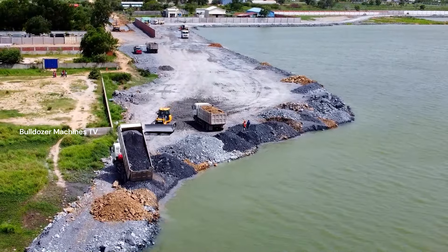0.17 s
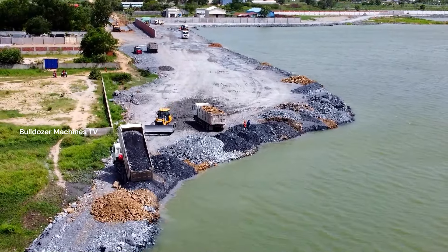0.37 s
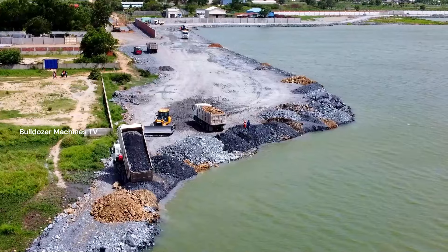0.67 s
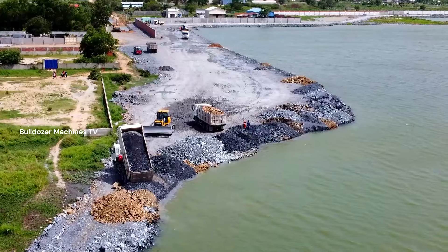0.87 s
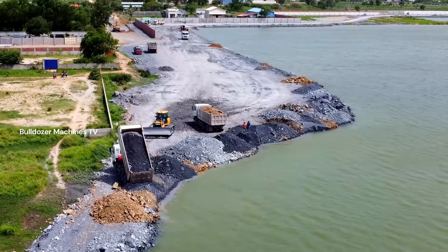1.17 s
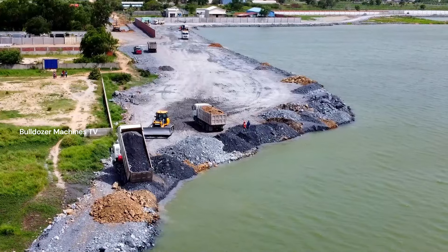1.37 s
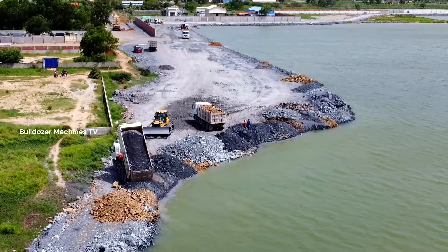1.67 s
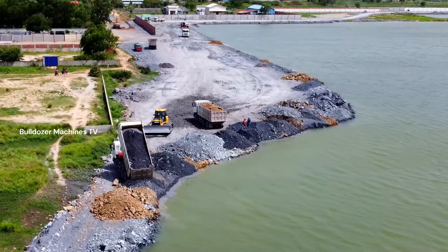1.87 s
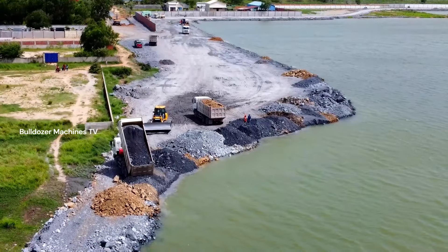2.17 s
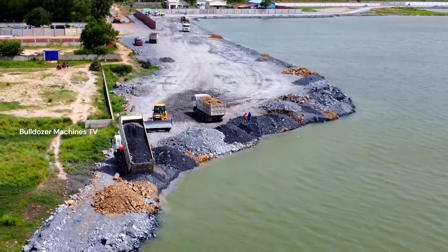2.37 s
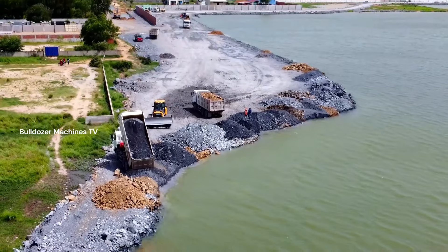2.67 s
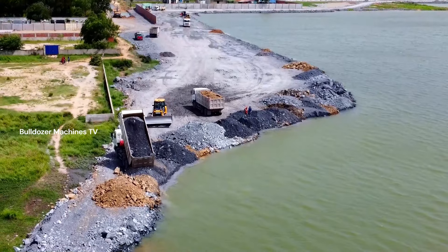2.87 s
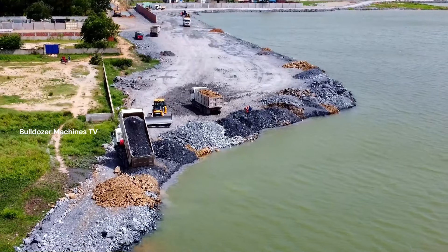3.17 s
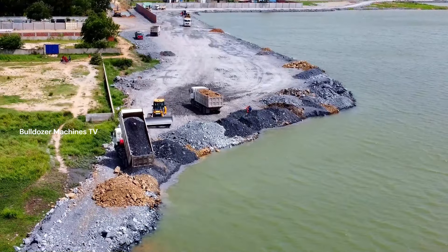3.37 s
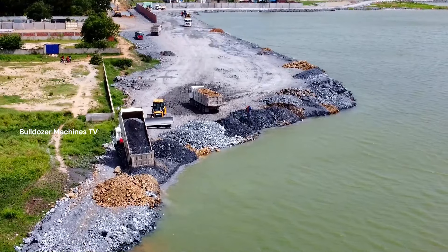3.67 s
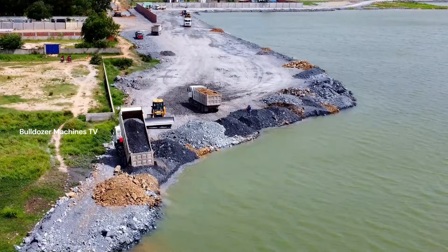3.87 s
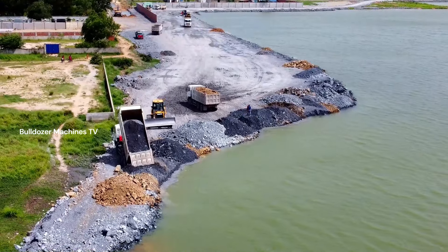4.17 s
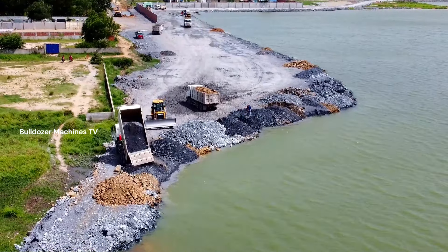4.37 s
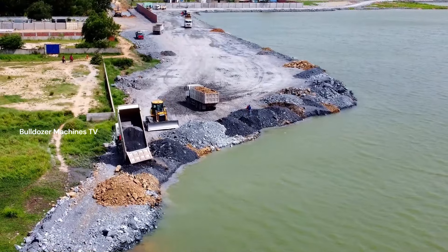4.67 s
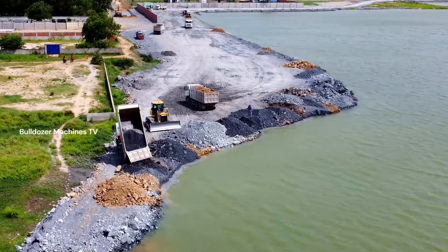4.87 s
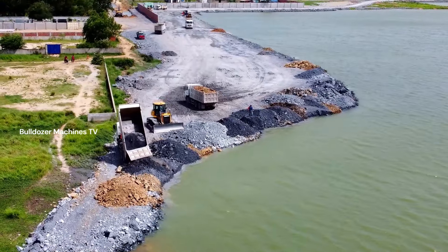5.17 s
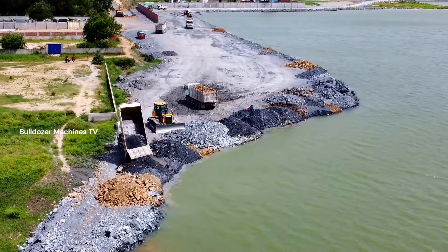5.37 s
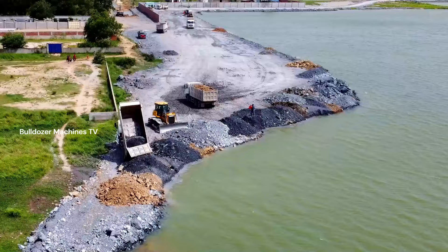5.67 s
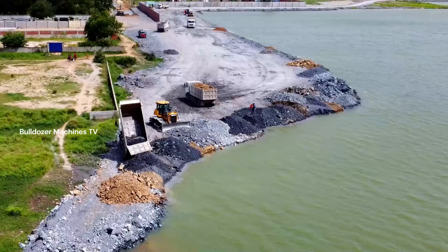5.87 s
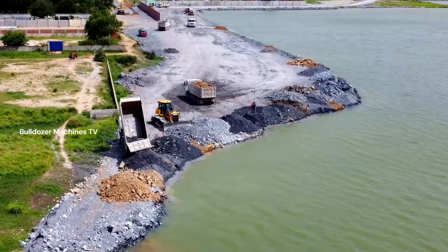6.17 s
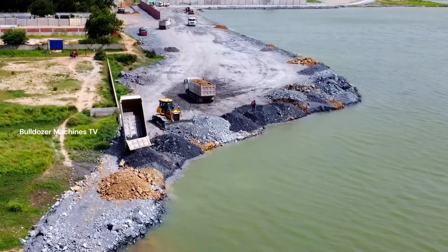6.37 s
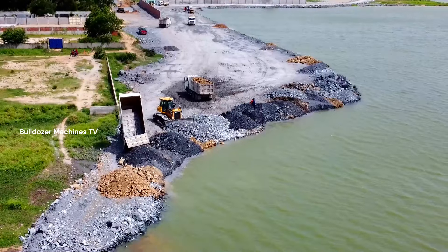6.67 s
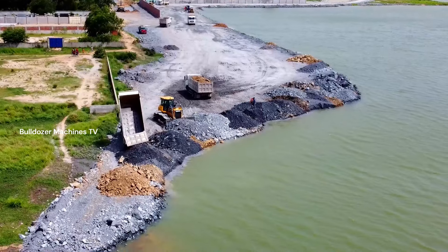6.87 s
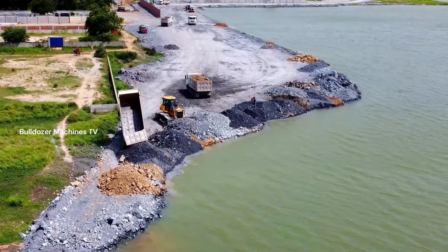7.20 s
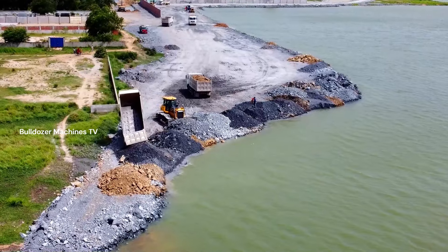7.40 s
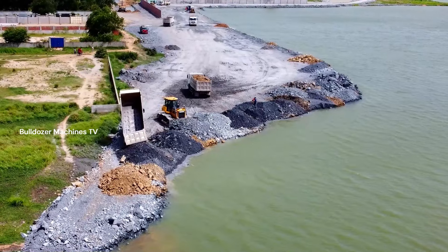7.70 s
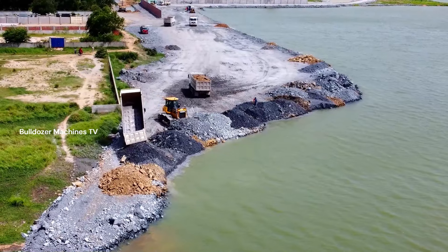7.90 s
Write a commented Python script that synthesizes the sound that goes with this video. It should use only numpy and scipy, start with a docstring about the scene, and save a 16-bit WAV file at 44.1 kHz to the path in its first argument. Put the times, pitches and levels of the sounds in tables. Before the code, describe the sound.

A dump truck unloads rock outdoors: dull thuds, sharp knocks, sliding gravel rushes, a straining engine, then hollow metal bangs and gusts on the microphones.

```python
"""Big stones thud and crack over a hiss of sliding gravel as a dump truck tips its load outdoors. The load is
showers of tiny filtered knocks and noise, under single blows placed in time; the diesel, a few sine overtones,
sags and picks up. Stone scrapes and bangs on the steel bed, which booms as a gliding sine, and near the end the
loose tailgate slams twice; the blows are noise and modes. A squeal, ground rumble, distant machines and gusts
of wind at the microphones lie around it."""
import sys
import numpy as np
from scipy import signal
from scipy.fft import rfft, irfft, next_fast_len
from scipy.io import wavfile
from scipy.ndimage import uniform_filter1d, map_coordinates

SR = 44100
rng = np.random.default_rng(int(sys.argv[2]) if len(sys.argv) > 2 else 0)


def master(y):
    """Save y as 16-bit WAV."""
    cut = np.clip(np.atleast_2d(y).T, -1, 1)
    pcm = np.round(cut * 32767)  # scale
    wavfile.write(sys.argv[1], SR, pcm.astype(np.int16))


N = 354475  # length in samples

# The flow of the load, before surges and slumps.
# Each row: time in seconds, then tumbling stones, sliding gravel and fine grit, each a level in dB.
LOAD_FLOW = [(0, -26.5, -32.5, -38.5), (.45, -27, -32.5, -37.5), (.72, -21.5, -30, -35.5),
             (1, -20.5, -30, -39), (1.5, -30.5, -35.5, -34.5), (1.85, -28, -33, -34), (2.2, -36, -36, -38),
             (2.85, -28, -34.5, -40.5), (3.25, -32, -34, -37), (3.5, -24.5, -28.5, -35.5),
             (3.82, -26.5, -31, -38.5), (5, -26, -28, -38.5), (5.24, -23, -26.5, -31),
             (5.345, -26, -27.5, -31), (5.42, -19.5, -26.5, -35), (5.54, -26.5, -29, -36.5),
             (5.88, -26.5, -28.5, -38.5), (6.12, -27, -32.5, -40.5), (6.3, -45, -36, -39.5),
             (6.62, -41, -40, -49.5), (6.78, -48, -42.5, -51), (7.1, -30, -43.5, -55),
             (7.55, -47.5, -38.5, -50), (8.04, -38, -45, -49.5)]
# The load slumps, gathering speed until it stops short.
# Each row: start in seconds, length in seconds, lift of the gravel in dB.
LOAD_SLUMPS = [(3.362, 0.27, 8), (3.87, 0.29, 5.5)]
SLUMP_STOP_S = 0.12
CRUNCH_DB = -6  # against the gravel flow
# Loose stones stop rolling off the top.
ROLLING_END_S, ROLLING_FADE_S = 1.46, 0.45

# Dull, heavy blows of stone and bed.
# Each row: start in seconds, level in dB, pitch in Hz, 60 dB decay in seconds, shaken rubble in dB.
HEAVY_THUDS = [(0.079, -14.5, 272, 0.065, -19), (0.23, -11.5, 231, 0.17, -13),
               (0.273, -5.5, 327, 0.043, -14.0), (0.511, -11, 257, 0.017, -29),
               (0.671, -13.5, 263, 0.075, -18.5), (0.687, -8.5, 246, 0.03, -20.5),
               (0.807, -8.5, 618, 0.084, -13.0), (0.891, -8.5, 192.0, 0.1, -18.5),
               (0.906, -13, 192.0, 0.13, -32), (0.966, -18, 275.0, 0.09, -16.5),
               (0.997, -10, 219, 0.05, -27.0), (1.057, -13, 246, 0.026, -30),
               (1.099, -7.5, 240, 0.033, -27), (1.123, -11.5, 447, 0.11, -21),
               (1.151, -14, 237.0, 0.02, -20), (1.242, -15, 260, 0.056, -27),
               (1.298, -11, 433.0, 0.084, -23), (1.37, -8, 252.0, 0.028, -21),
               (1.717, -8.5, 434, 0.13, -12), (1.895, -11.0, 428, 0.077, -19.5),
               (2.277, -16, 309, 0.12, -27), (2.367, -9.5, 441, 0.025, -29), (2.41, -8, 244.0, 0.033, -33),
               (2.43, -20, 237.0, 0.035, -30.0), (2.458, -17.0, 301.0, 0.1, -25),
               (2.558, -7.5, 232, 0.032, -18), (2.618, -14, 450, 0.028, -25),
               (2.804, -18, 320.0, 0.057, -25.0), (2.882, -12.5, 301.0, 0.015, -28.0),
               (2.936, -12, 235, 0.036, -20), (2.939, -14, 105, 0.12, -38),
               (3.014, -12.5, 320.0, 0.016, -37.0), (3.053, -17.0, 332, 0.1, -19.5),
               (3.408, -14, 365, 0.042, -18.5), (3.48, -13, 416, 0.072, -25),
               (3.507, -19, 237.0, 0.062, -21), (3.633, -15, 505, 0.09, -20), (3.659, -10, 192, 0.05, -15),
               (3.671, -7.5, 444, 0.02, -20), (4.165, -5, 210.0, 0.033, -14), (4.221, -15, 100, 0.12, -28),
               (4.235, -12.0, 186.0, 0.09, -18), (5.189, -16, 364, 0.09, -24),
               (5.245, -14, 267.0, 0.079, -17), (5.256, -14, 267.0, 0.06, -17),
               (5.385, -15, 423, 0.1, -18.5), (5.432, -16.5, 437, 0.15, -22),
               (5.603, -9.5, 435, 0.049, -19), (6.994, -13.5, 407.0, 0.074, -12.5),
               (7.026, -14, 388, 0.078, -22), (7.269, -12.5, 196, 0.065, -18.0)]
RUBBLE_T60_S = 0.15
# Stone grinding on stone or under the tailgate.
# Each row: start in seconds, level in dB, pitch in Hz, treble slope in dB per octave from 2.5 to 5 kHz.
GRINDING_CRACKS = [(0.032, -28, 2190, -17), (0.063, -19, 2490, -10), (0.229, -24, 1440, -19),
                   (0.269, -13, 1650, -12.5), (0.312, -23.5, 2550, 10), (.559, -21.5, 1660, -7),
                   (.599, -20.5, 1800, -19), (0.712, -21, 2610, -4), (.747, -23.5, 1610, -14),
                   (0.805, -13.5, 2500, -15), (.924, -22.5, 2500, 10), (0.971, -19, 1210, -12),
                   (0.995, -25.5, 2580, 6), (1.095, -16.5, 1790, -4), (1.119, -14.5, 1420, -2),
                   (1.298, -13.5, 1530, -16.5), (1.373, -36, 1440, -20), (1.715, -20.5, 2560, -3),
                   (1.974, -16, 1560, -7.5), (2.235, -24, 2060, -2), (2.275, -24, 1500, -7),
                   (2.365, -28, 2300, -14), (2.438, -34, 2700, -6), (2.474, -27, 3000, 0),
                   (2.611, -27.5, 2400, -12), (2.733, -28, 1690, -7.5), (2.816, -24.5, 1360, -16),
                   (3.238, -27.5, 2740, -11), (3.316, -23, 1470, -13), (3.398, -17, 3580, -5.5),
                   (3.579, -18.5, 1620, 4), (3.632, -15, 1150, -7), (3.655, -13.5, 1130, -7),
                   (3.701, -18.5, 2230, -3), (3.729, -19.5, 3730, -5), (4.16, -10, 2500, -7),
                   (4.183, -15.5, 2470, -11), (4.223, -22, 2220, -5), (5.612, -17, 1680, -11),
                   (5.742, -34, 1600, -12), (5.763, -23, 1940, -18), (5.825, -19.5, 2370, -10),
                   (6.993, -18, 2920, -11.5), (7.03, -13, 1920, -19.5), (7.246, -23, 1600, -21),
                   (7.272, -19, 2500, -20), (7.322, -27, 2000, -16)]
CRACK_T60_S = 0.083
# Clean knocks of single stones.
# Each row: start in seconds, level in dB, nominal pitch in Hz, 60 dB decay in seconds.
STONE_KNOCKS = [(.064, -22.5, 1700, .025), (.228, -18, 700, .04), (.27, -18.5, 1396, 0.054),
                (.444, -14, 1480, .012), (.6, -14, 1254, 0.044), (.562, -24, 1500, .025),
                (.71, -17.5, 2300, .02), (.752, -20, 1600, .03), (.809, -7, 697, 0.077),
                (.811, -14, 1790, .04), (.972, -14, 1250, .04), (.996, -21, 2600, .025),
                (1.12, -17.5, 1510, .06), (1.298, -16, 1365, 0.045), (1.377, -23, 1440, .025),
                (1.508, -25, 1700, .018), (1.718, -10.5, 608, 0.063), (1.891, -13, 540, 0.088),
                (2.365, -6.5, 1260, 0.018), (2.367, -7, 652, 0.024), (2.439, -23, 2660, .016),
                (2.475, -13.5, 2500, 0.015), (2.506, -30, 1600, .014), (2.573, -23, 760, .025),
                (2.66, -6, 805, 0.021), (2.67, -24, 644, .025), (2.733, -28, 2300, .02),
                (2.815, -25, 1350, .022), (2.882, -22, 1500, .02), (2.968, -27, 1500, .03),
                (3.062, -26, 1400, .025), (3.239, -20, 3200, .014), (3.315, -22, 1450, .025),
                (3.402, -40, 1670, .01), (3.584, -15, 1630, 0.02), (3.657, -12, 1100, .035)]
# Splinters of stone. Each row: start in seconds, level in dB.
STONE_CHIPS = [(.272, -19), (0.711, -16.5), (0.861, -19), (1.065, -15), (1.589, -21.5), (1.717, -21),
               (2.299, -23), (3.005, -25.5), (3.398, -26.5), (3.659, -20)]
CHIP_T60_S = 0.013

# Blows on the steel bed and the tailgate. Each row: start in seconds, level in dB before tilt and lift,
# base decay in seconds, main pitch in Hz, treble tilt in dB per octave, lift at the main pitch in dB.
STEEL_BANGS = [(5.246, -22.5, 0.16, 515, 2.5, 13.5), (5.383, -27, 0.61, 520, 3, 14),
               (5.564, -22, 0.29, 646, 0, 5), (5.612, -26, 0.071, 544, -4.5, 15),
               (5.733, -24, 0.2, 1400, 0, 10), (5.757, -25.5, 0.17, 1010, 1.5, 15.5),
               (5.771, -29, 0.12, 1900, 0, 15), (5.832, -23.5, 0.23, 550, 2.5, 10.5),
               (5.888, -26, 0.071, 523, 1.5, 11.5), (6.785, -30.5, 0.98, 340, -5.5, -5),
               (6.977, -18, 0.19, 870, 0, 12), (6.991, -15.5, 0.16, 520, 1, -2),
               (7.022, -17.5, 0.073, 1500, -1.5, 8), (7.029, -17.5, 0.053, 2500, -2.5, 6),
               (7.058, -30.5, 0.25, 3000, -2, 13), (7.056, -28.5, 0.52, 925, -1.5, 9.5),
               (7.16, -29, 0.27, 700, -4, 3), (7.214, -23, 0.15, 945, -1, 12.5),
               (7.241, -20, 0.27, 770, -1, 8.5), (7.246, -27, .12, 2300, -1, 8),
               (7.267, -20, 0.24, 684, -2, 4), (7.288, -27, 0.11, 2400, -2.5, 9),
               (7.315, -24.5, 0.38, 443, -2.5, 8.5), (7.337, -30.5, 0.11, 800, 1, 9),
               (7.363, -32.5, 0.12, 3600, 2.5, 8), (7.372, -32.5, 0.12, 760, -2, 12.5)]
# What the steel rings with, before each blow detunes it.
# Each row: frequency in Hz, relative level in dB, 60 dB decay in seconds.
STEEL_MODES = [(187.5, 4, 0.4), (401.5, 3.5, 0.24), (585.6, -0.5, 0.17), (668, 0, 0.31), (818, -11.5, 0.33),
               (959, -2.5, 0.18), (1176, -3.5, 0.22), (1315, -12.5, 0.23), (1565, -8, 0.26),
               (1850, -6.5, 0.25), (2183, -15.5, 0.34), (2387, -7, 0.34), (2484, -15, 0.22),
               (2830, -9, 0.37), (3320, -18, 0.44)]
# Stone and tailgate drag over the steel.
# Each row: middle in seconds, length in seconds, level in dB, highest pitch of the hollow scrape in Hz.
BED_SCRAPES = [(3.652, 0.12, -26, 694), (3.944, 0.029, -26, 670), (4.114, 0.16, -31, 804),
               (5.196, 0.19, -22.5, 660), (5.693, 0.15, -28, 674), (5.775, 0.098, -26, 855),
               (6.01, .16, -32, 606), (6.197, 0.2, -38, 616), (6.852, 0.15, -33, 780),
               (6.965, .06, -30.5, 700)]
SCRAPE_WIDTH_HZ, SCRAPE_RASP_DB = 390, -10
SCRAPE_BEND = 0.08  # share of the pitch missing at the ends of the swell
# A stone edge makes the steel sing briefly.
# Each row: start in seconds, peak level in dB, pitch in Hz, 60 dB decay in seconds.
STEEL_PINGS = [(2.552, -38, 4800, 0.023), (3.695, -28.5, 5530, 0.18)]
# The emptying bed booms once and keeps droning while stones drag over it.
BOOM_START_S, BOOM_END_S = 5.56, 6.38
BOOM_HZ, BOOM_SAG_HZ_PER_S, BOOM_WAVER_HZ = 110.6, 5.6, 3.03
BOOM_DB, BOOM_RISE_S, BOOM_T60_S = -23.5, 0.07, 0.7
DRONE_DB, DRONE_RELEASE_S = -30, 0.056

# The diesel lugs down under the hoist and recovers.
# Each row: time in seconds, mean firing rate in Hz, mean level in dB.
ENGINE_LUGGING = [(0, 70.7, -26.5), (.2, 68.5, -23), (.47, 71, -24), (.85, 64.4, -34.5), (1.6, 53, -32.5),
                  (2.15, 42.7, -29), (2.42, 37.94, -42), (2.7, 35.56, -35), (3.03, 36.5, -32),
                  (3.27, 42.35, -20), (3.45, 39.5, -21.5), (3.6, 36, -27), (3.73, 38.85, -31),
                  (3.94, 50.9, -18.5), (4.55, 69.7, -35), (5.8, 67, -40), (6.1, 69.44, -24),
                  (6.45, 67.4, -37), (6.9, 66.86, -28), (7.2, 65, -37), (7.6, 62, -45), (7.92, 76, -21.5),
                  (8.04, 75.4, -32)]
# Exhaust overtones. Each row: multiple of the firing rate, relative level in dB.
EXHAUST_OVERTONES = [(1, -5), (2, -19.5), (3, -22.5)]
# The exhaust pipe lifts any overtone above the first that falls near its own note.
PIPE_HZ, PIPE_OCTAVES, PIPE_DB = 76, 0.2, 10.5
# A faint squeal of the truck. Each row: time in seconds, level in dB, pitch in Hz.
TRUCK_SQUEAL = [(7.75, -73, 4444), (7.85, -58, 4500), (7.99, -46, 4675), (8.04, -51, 4700)]

# The ground rumbles all the time, and harder under falling stones; the bare bed shudders too.
RUMBLE_DB, RUMBLE_UNDER_STONES_DB = -35, -8  # the second against the stone flow
RUMBLE_LUMPS_DB, RUMBLE_LUMPS_PER_S = 3, 16
BARE_BED_DB, SHUDDER_FADE_DB_PER_S = -29, 0.5
GROUND_SHAKE_DB, GROUND_SHAKE_T60_S = -19, 0.12  # level against the thud
SITE_DB = -40.5
# Wind at the microphones, before eddies. Each row: time in seconds, level in dB.
WIND_GUSTS = [(5.3, -61), (5.56, -30), (5.85, -48), (6.22, -46), (6.27, -24), (6.42, -31), (6.49, -39),
              (6.6, -31), (6.73, -25), (6.98, -23.5), (7.12, -36), (7.42, -39), (7.52, -22.5), (7.63, -38),
              (8.04, -35)]
EDDY_DB, EDDIES_PER_S = 4, 42

# Relative spectra of the sources. Each row: frequency in Hz, density in dB per Hz.
STONES_SPECTRUM = [(90, -13), (150, -2), (215, 2), (320, 1), (480, 1), (620, -3), (780, -7.5), (1100, -52),
                   (2500, -65)]
GRAVEL_SPECTRUM = [(400, 5.5), (850, 0.5), (1400, 1), (2000, -3), (2550, 1), (3200, -7), (4200, -6),
                   (6000, -10.5), (10000, -16), (13000, -53)]
GRIT_SPECTRUM = [(1800, -8), (3800, -4.5), (5500, -2.5), (7000, -1), (8500, -0.5), (10200, 6),
                 (11500, -7.5), (13000, -20), (15000, -38)]
CRACK_SPECTRUM = [(400, 7), (900, 3.5), (2600, 0.5), (4000, 3.5), (7000, -1), (10200, 2.5), (11500, -12),
                  (13000, -32), (15000, -47)]
CHIP_SPECTRUM = [(2000, -10), (4500, -4), (7000, 3), (11500, 2.5), (13000, -29), (15000, -25)]
CRASH_SPECTRUM = [(60, -28), (110, -6), (180, 5), (430, -3.5), (620, -2.5), (950, -1), (1250, -9.5),
                  (1800, -10), (2700, -12), (3700, -14), (7000, -24), (10000, -36), (13000, -56)]
GROUND_SPECTRUM = [(18, -33), (35, -26), (55, 1), (100, 2), (160, -5.5), (260, -17.5), (500, -39),
                   (1000, -85)]
SITE_SPECTRUM = [(60, -6), (280, 0.5), (480, -13), (800, -16), (1300, -14), (2000, -19.5), (2500, -17.5),
                 (3200, -22.5), (5000, -28.5), (9000, -43), (13000, -60)]
WIND_SPECTRUM = [(20, -14), (65, 0), (110, -3), (200, -5.5), (400, -9.5), (620, -11.5), (1000, -16.5),
                 (1500, -49), (3000, -65)]

# Likeness of the two microphones. Each row: frequency in Hz, likeness (held within 0 to 1 in use).
ROCK_LIKENESS = [(750, 2), (950, 0.43), (1200, 0.5), (2600, 0), (4800, 0.54), (6000, 0.97), (9000, 0.78),
                 (11200, 1.42)]
STEEL_LIKENESS = [(250, 0.88), (550, 0.68), (950, .3), (1500, 0.89), (3000, 0.63), (8000, 0.31)]
# Phase between the microphones. Each row: frequency in Hz, lead of the left in radians.
ROCK_LEAD = [(220, 0), (340, .35), (600, 1.45), (950, 2.9), (1500, 5.9), (1900, 6.3), (2500, 8.1),
             (3300, 6.8), (5500, 12.2), (6600, 13.2), (7700, 14.9), (9900, 15.7), (11000, 17.3),
             (11600, 18.85)]
STEEL_LEAD = [(150, -.1), (380, -.45), (580, -1.14), (950, 0.55), (1600, 0.25), (2600, -0.2), (5000, 0)]
# Balance of the microphones. Each row: frequency in Hz, left minus right in dB.
ROCK_SLANT = [(150, -0.5), (260, -2), (420, -3.5), (800, 1), (1300, -0.5), (1900, 1), (2350, -5.5),
              (3400, 1), (7000, -1), (11000, 0)]
STEEL_SLANT = [(150, -2), (350, -1.5), (600, -13), (950, -7), (1500, -1), (2500, -2.5), (8000, -1)]
EDGE_HZ = 15300  # top of the finished band


def gain_of(db):
    """Decibels to gain."""
    return 10 ** (np.asarray(db) / 20)


def evened(x):
    """Scales to an rms of 1."""
    return x / np.sqrt(np.mean(x ** 2) + 1e-20)


def read(points, hz):
    """Reads a frequency table on a log-frequency axis."""
    f, value = np.transpose(points)
    return np.interp(np.log(hz + 1), np.log(f + 1), value)


def curves(rows):
    """Each column of a control table, sample by sample."""
    s, *columns = np.transpose(rows)
    return [np.interp(np.arange(N) / SR, s, c) for c in columns]


def add(mix, s, sound):
    """Mixes a sound in at time s."""
    part = mix[:, max(round(s * SR), 0):][:, :sound.shape[1]]
    part += sound[:, :part.shape[1]]


def noise(length):
    """Stereo white noise, unrelated left and right."""
    return rng.standard_normal((2, length))


def shaped(x, db_at):
    """Filters by a function that gives dB for each frequency."""
    size = next_fast_len(x.shape[-1])
    gain = gain_of(db_at(np.fft.rfftfreq(size, 1 / SR)))
    return irfft(rfft(x, size) * gain, size)[..., :x.shape[-1]]


def coloured(x, spectrum):
    """Filters x by a spectrum table and scales to an rms of 1."""
    return evened(shaped(x, lambda f: read(spectrum, f)))


def bump(f, hz, octaves):
    """A bell of height 1 around hz on a log-frequency axis."""
    return np.exp(-(np.log2(f / hz) / octaves) ** 2)


def drift(per_s):
    """A random line through per_s knots a second, with an rms of 1."""
    knots = rng.standard_normal(int(N / SR * per_s) + 4)
    return evened(map_coordinates(knots, [np.arange(N) / SR * per_s], order=1))


def strike(t, rise, t60):
    """A blow's envelope: a soft rise, then a steady decay of at least 4 ms; its top is 1."""
    shape = (1 - np.exp(-(t / rise) ** 2)) * gain_of(-60 * t / max(t60, .004))
    return shape / shape.max()


def resonate(x, hz, width_hz):
    """A steep resonance that follows the curve hz: shift down to zero, low-pass, shift back; rms 1."""
    turn = np.exp(2j * np.pi * np.cumsum(hz) / SR)
    low_pass = signal.butter(2, width_hz / 2, fs=SR, output="sos")
    return evened((turn * signal.sosfilt(low_pass, x / turn)).real)


def patchy(x, patchy_db):
    """Lifts and dips random patches of time and frequency, so the colour wanders."""
    z = signal.stft(x, nperseg=512)[2]
    patches = uniform_filter1d(rng.standard_normal(z.shape[1:]), size=6, axis=0)
    patches = evened(uniform_filter1d(patches, size=22, axis=1))
    return evened(signal.istft(z * gain_of(patchy_db * patches), nperseg=512)[1][:, :N])


def grains(low_hz, high_hz, per_s, spread_db, t60, octaves, count=14):
    """A shower of small collisions; each size of stone has its own pitch, and the force is random."""
    t, out = np.arange(SR // 12) / SR, np.zeros((2, N))
    for hz in np.geomspace(low_hz, high_hz, count):
        knock = shaped(noise(len(t)), lambda f: -3 * (np.log2((f + 1) / hz) / octaves) ** 2)
        knock = evened(knock * strike(t, t60 / 20, t60)) * np.sqrt(hz)
        hit = rng.random(N) < per_s / count / SR
        force = gain_of(spread_db * np.minimum(rng.exponential(1, N)[hit], 4))
        clicks = np.zeros(N)
        clicks[hit] = force * (-1) ** np.arange(len(force))  # alternating signs
        out += signal.oaconvolve(clicks[None], knock, axes=1)[:, :N]
    return evened(out)


def load():
    """Stones tumble, gravel scrapes and grit hisses, all in the same small surges."""
    stones_db, gravel_db, grit_db = flow()
    surge = drift(45)
    stones = grains(159, 805, per_s=800, spread_db=1.5, t60=0.034, octaves=0.62, count=8)
    stones = coloured(stones, STONES_SPECTRUM)
    gravel = grains(940, 8800, per_s=1000, spread_db=0.0, t60=0.022, octaves=0.47, count=9)
    gravel = coloured(patchy(gravel + 1.2 * noise(N), patchy_db=1.5), GRAVEL_SPECTRUM)
    # t60 sets the rise here; strike holds the decay at 4 ms
    grit = grains(4100, 19300, per_s=650, spread_db=3.0, t60=0.0031, octaves=0.24, count=8)
    grit = coloured(patchy(grit + 2.3 * noise(N), patchy_db=1.5), GRIT_SPECTRUM)
    return (stones * gain_of(stones_db + 0.11 * surge)
            + gravel * gain_of(gravel_db + 1.4 * surge)
            + grit * gain_of(grit_db + 1.16 * surge))


def slump(s, length):
    """Speed of one slump: a steady gain from 0 to 1, then a short stop."""
    return np.interp(np.arange(N) / SR, [s, s + length, s + length + SLUMP_STOP_S], [0, 1, 0])


def flow():
    """Levels in dB of stones, gravel and grit: the steady flow, lifted by each slump."""
    lift_db = sum(db * slump(s, length) for s, length, db in LOAD_SLUMPS)
    stones_db, gravel_db, grit_db = curves(LOAD_FLOW)
    return stones_db + 1.04 * lift_db, gravel_db + lift_db, grit_db + 0.68 * lift_db


def thuds():
    """A heavy blow gives a few dull cycles of a sine, with noise for the rubble it shakes."""
    t, out = np.arange(SR // 4) / SR, np.zeros((2, N))
    for s, db, hz, t60, rubble_db in HEAVY_THUDS:
        rubble = coloured(noise(len(t)), STONES_SPECTRUM) * strike(t, 0.0026, RUBBLE_T60_S)
        body = np.sin(2 * np.pi * hz * t) * strike(t, 0.0037, t60)
        add(out, s, gain_of(db) * body + gain_of(rubble_db) * rubble)
    return out


def cracks():
    """Hard faces grind: a short gritty burst, lifted near the stone's own pitch."""
    t, out = np.arange(SR // 4) / SR, np.zeros((2, N))
    for s, db, hz, treble_db in GRINDING_CRACKS:
        grit_db = 0.25 * evened(uniform_filter1d(rng.standard_normal(len(t)), size=40))
        chatter = noise(len(t)) * gain_of(grit_db)
        burst = shaped(chatter, lambda f: read(CRACK_SPECTRUM, f) + 7 * bump(f + 1, hz, 0.082)
                       + treble_db * np.clip(np.log2((f + 1) / 2500), 0, 1))
        add(out, s, gain_of(db) * evened(burst) * strike(t, 0.0017, CRACK_T60_S))
    return out


def knocks():
    """A single stone gives a tock: a snap of contact and a few close modes, quickly gone."""
    t, out = np.arange(SR // 8) / SR, np.zeros((2, N))
    mode_shares = [(.55, 0.3), (.78, -0.39), (1, 0.68), (1.27, -0.12)]  # multiple of the pitch, share
    for s, db, hz, t60 in STONE_KNOCKS:
        modes = sum(share * np.sin(2 * np.pi * ratio * hz * rng.uniform(0.95, 1.03, (2, 1)) * t)
                    for ratio, share in mode_shares)
        snap = evened(shaped(noise(len(t)), lambda f: -8 * np.log2((f + 1) / hz) ** 2))
        add(out, s, gain_of(db) * (modes + gain_of(-14.5) * snap) * strike(t, 0.001, t60))
    return out


def chips():
    """A splinter snaps off with a very short, bright tick of noise."""
    t, out = np.arange(SR // 16) / SR, np.zeros((2, N))
    for s, db in STONE_CHIPS:
        tick = coloured(noise(len(t)), CHIP_SPECTRUM)
        add(out, s, gain_of(db) * tick * strike(t, 0.0004, CHIP_T60_S))
    return out


def strays():
    """Loose stones roll off the top of the load early on: small bumps and clacks at random."""
    rolling = np.clip((ROLLING_END_S - np.arange(N) / SR) / ROLLING_FADE_S, 0, 1)
    bumps = grains(190, 340, per_s=30, spread_db=-1.0, t60=0.075, octaves=0.33, count=5)
    bumps = coloured(bumps, STONES_SPECTRUM)
    clacks = grains(780, 2950, per_s=55, spread_db=4.5, t60=0.018, octaves=0.51, count=7)
    clacks = coloured(clacks, GRAVEL_SPECTRUM)
    return rolling * (gain_of(-35.5) * bumps + gain_of(-37.0) * clacks)


def crunch():
    """As the load slumps, stones crush against each other in a dense crackle."""
    speed = sum(slump(s, length) for s, length, _ in LOAD_SLUMPS)
    crackle = grains(900, 8500, per_s=400, spread_db=1.0, t60=0.011, octaves=0.88, count=7)
    return coloured(crackle, GRAVEL_SPECTRUM) * speed * gain_of(flow()[1] + CRUNCH_DB)


def bangs():
    """Each blow sets off a noisy crash of dense panel modes, and single modes that ring on."""
    t, out = np.arange(SR * 3 // 5) / SR, np.zeros((2, N))
    for s, db, t60, main_hz, tilt_db, focus_db in STEEL_BANGS:
        crash = coloured(noise(len(t)), CRASH_SPECTRUM)
        # stones lying on the panels detune them a little from blow to blow
        ring = sum(gain_of(level) * strike(t, 0.001, ring_t60)
                   * np.sin(2 * np.pi * (hz * rng.uniform(0.97, 1.008) * t + rng.random((2, 1))))
                   for hz, level, ring_t60 in STEEL_MODES)
        # loose stones chatter on the ringing panels
        chatter = evened(uniform_filter1d(rng.standard_normal(len(t)), size=150))
        crash = crash * gain_of(-2.5 + 2.76 * chatter)
        # the treble dies first
        dull = shaped(crash, lambda f: -10 * np.log10(1 + (f / 1600) ** 4))
        bright = crash - dull
        blow = dull * strike(t, 0.002, 1.35 * t60) + bright * strike(t, 0.0049, 0.77 * t60)
        blow = blow + gain_of(3.5) * ring / abs(ring).max()
        blow = shaped(blow, lambda f: tilt_db * np.log2(np.clip(f, 200, 5000) / 700)
                      + focus_db * bump(f + 1, main_hz, 0.77))
        add(out, s, gain_of(db) * blow)
    return out


def scrape():
    """Each drag over the bed swells and fades in a broad, hollow resonance, rattling as it goes."""
    out = np.zeros((2, N))
    for middle, length, db, hz in BED_SCRAPES:
        swell = np.hanning(int(length * SR))
        rub = noise(len(swell))
        note = hz * (1 + SCRAPE_BEND * (swell - 1))
        hollow = resonate(rub, note, width_hz=SCRAPE_WIDTH_HZ)
        rasp = gain_of(SCRAPE_RASP_DB) * resonate(rub, 2.1 * note, width_hz=1000)
        add(out, middle - length / 2, gain_of(db) * (hollow + rasp) * swell)
    return out * gain_of(3.2 * drift(130))


def pings():
    """A single high mode of the steel, dying fast."""
    t, out = np.arange(SR // 3) / SR, np.zeros((2, N))
    for s, db, hz, t60 in STEEL_PINGS:
        tone = np.sin(2 * np.pi * (hz * t + 0.21 * rng.random((2, 1))))
        add(out, s, gain_of(db) * tone * strike(t, 0.0034, t60))
    return out


def boom():
    """The lowest panel note of the bed, sagging, kept going by the stones that drag over it."""
    t = np.maximum(np.arange(N) / SR - BOOM_START_S, 0)
    time_left = BOOM_END_S - BOOM_START_S - t
    drone = np.clip(np.minimum(t / BOOM_RISE_S, time_left / DRONE_RELEASE_S), 0, 1)
    level = gain_of(BOOM_DB) * strike(t, BOOM_RISE_S, BOOM_T60_S) + gain_of(DRONE_DB) * drone
    hz = BOOM_HZ - BOOM_SAG_HZ_PER_S * t + BOOM_WAVER_HZ * drift(20)
    note = np.sin(2 * np.pi * np.cumsum(hz) / SR)
    return evened(note) * level * gain_of(2.7 * drift(30))


def engine():
    """The diesel's firing note and overtones, with an uneven rate and level."""
    hz, db = curves(ENGINE_LUGGING)
    turns = np.cumsum(hz * (1 + 0.0079 * drift(12))) / SR
    note = np.zeros(N)
    for k, level in EXHAUST_OVERTONES:
        pipe_db = (k > 1) * PIPE_DB * bump(k * hz, PIPE_HZ, PIPE_OCTAVES)
        note += gain_of(level + pipe_db) * np.sin(2 * np.pi * k * turns)
    return evened(note) * gain_of(db + 0.63 * drift(12))


def squeal():
    """A thin, rough whistle of rubbing metal: noise through a gliding resonance."""
    db, hz = curves(TRUCK_SQUEAL)
    started = np.arange(N) / SR > TRUCK_SQUEAL[0][0]
    return resonate(noise(N), hz, width_hz=330) * gain_of(db) * started


def rumble():
    """The low, lumpy shudder of truck and ground, nearly alike at both microphones; thuds add to it."""
    t, since = np.arange(SR // 2) / SR, np.arange(N) / SR - BOOM_START_S
    power = gain_of(RUMBLE_DB) ** 2 + gain_of(flow()[0] + RUMBLE_UNDER_STONES_DB)[None] ** 2
    power += gain_of(BARE_BED_DB - SHUDDER_FADE_DB_PER_S * since) ** 2 * (since > 0)
    for s, db, *_ in HEAVY_THUDS:
        shake = gain_of(db + GROUND_SHAKE_DB) * strike(t, 0.015, GROUND_SHAKE_T60_S)
        add(power, s, shake[None] ** 2)
    lumps = gain_of(RUMBLE_LUMPS_DB * drift(RUMBLE_LUMPS_PER_S))
    shudder = coloured(rng.standard_normal(N) + 0.11 * noise(N), GROUND_SPECTRUM)
    return shudder * np.sqrt(power) * lumps


def site():
    """Distant machines: a lumpy wash of noise, nearly the same at both microphones."""
    wash = patchy(rng.standard_normal(N) + 0.21 * noise(N), patchy_db=3.5)
    return coloured(wash, SITE_SPECTRUM) * gain_of(SITE_DB + 0.5 * drift(31))


def wind():
    """Gusts push on one microphone as they pull on the other; stronger eddies are brighter."""
    db = curves(WIND_GUSTS)[0] + EDDY_DB * drift(EDDIES_PER_S)
    push_pull = rng.standard_normal(N) * np.array([[1], [-1]])
    air = coloured(push_pull + 0.14 * noise(N), WIND_SPECTRUM)
    low = shaped(air, lambda f: -10 * np.log10(1 + (f / 250) ** 4))
    high = (air - low) * gain_of(.25 * (db - db.max()) - 1.0)
    return gain_of(db) * (low + high)


def yard(x):
    """A short, diffuse return from the truck and the heaps: a decaying noise tail."""
    t = np.arange(SR // 2) / SR
    tail = shaped(noise(len(t)), lambda f: -3 * np.log2(1 + f / 2000)) * strike(t, 0.014, 0.041)
    return signal.oaconvolve(x, tail / np.linalg.norm(tail[0]), axes=1)[:, :N]


def pair(x, likeness, lead, slant):
    """Blends the two sides into what two spaced microphones hear: likeness, phase and balance."""
    size = next_fast_len(N)
    hz, (a, b) = np.fft.rfftfreq(size, 1 / SR), rfft(x, size)
    same = np.clip(read(likeness, hz), 0, 1)
    half_db = read(slant, hz) / 2
    left = a * gain_of(half_db)
    right = (same * a + np.sqrt(1 - same ** 2) * b) * gain_of(-half_db) * np.exp(-1j * read(lead, hz))
    return irfft(np.array([left, right]), size)[:, :N]


def scene():
    """Rock, steel, truck, site and wind together."""
    rocks = thuds() + cracks() + knocks() + chips() + strays() + crunch()
    tipping = pair(load() + rocks + gain_of(-13) * yard(rocks), ROCK_LIKENESS, ROCK_LEAD, ROCK_SLANT)
    steel = pair(bangs() + pings() + scrape(), STEEL_LIKENESS, STEEL_LEAD, STEEL_SLANT)
    truck = (engine() + boom()) * gain_of([[-.3], [.3]]) + rumble() + squeal()
    return tipping + steel + truck + site() + wind()


def record(dry):
    """Rounds off the tallest peaks, then limits the band with a steep low-pass."""
    rounded = dry / (1 + (dry / .95) ** 6) ** (1 / 6)
    low_pass = signal.firwin(511, EDGE_HZ, window=("kaiser", 9), fs=SR)
    return signal.oaconvolve(rounded, low_pass[None], "same")


dry = scene()
out = record(dry)
master(out)
```